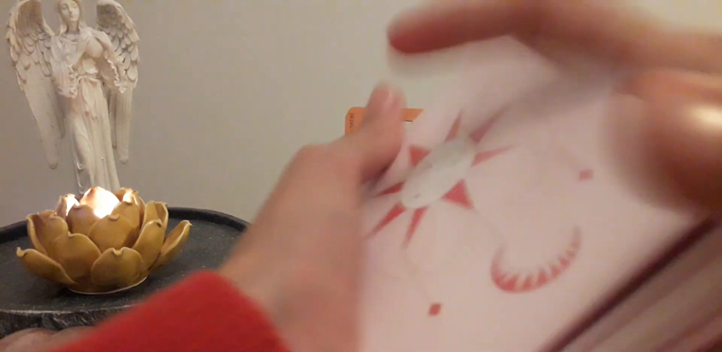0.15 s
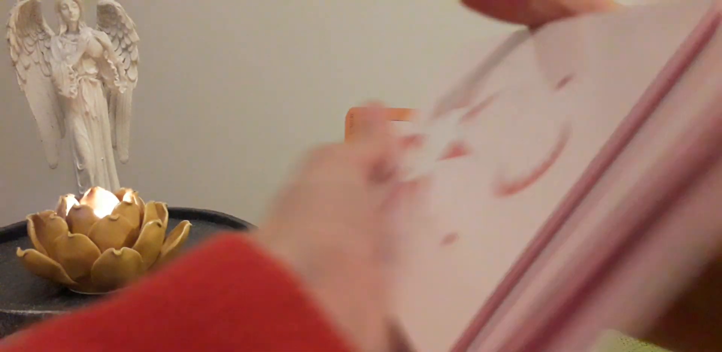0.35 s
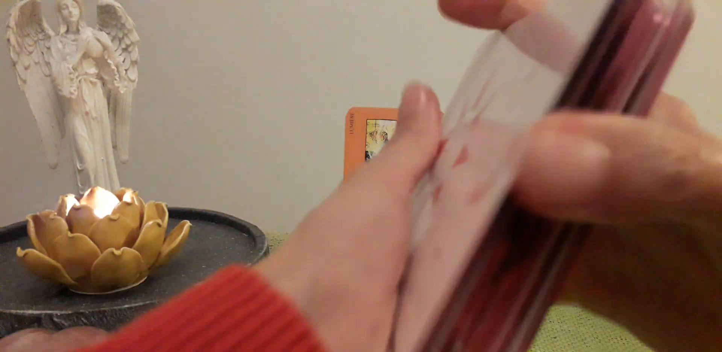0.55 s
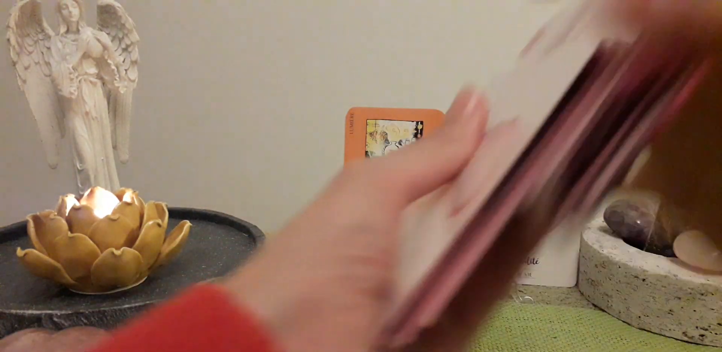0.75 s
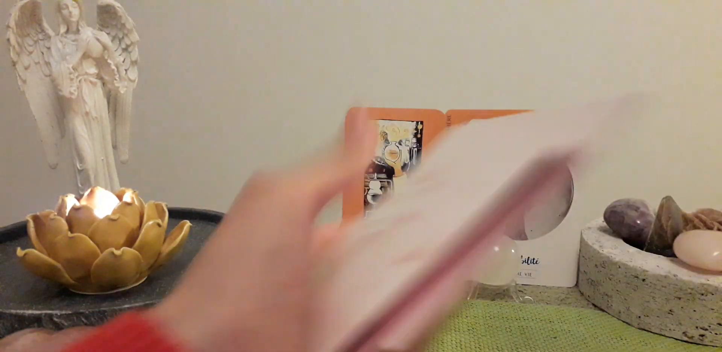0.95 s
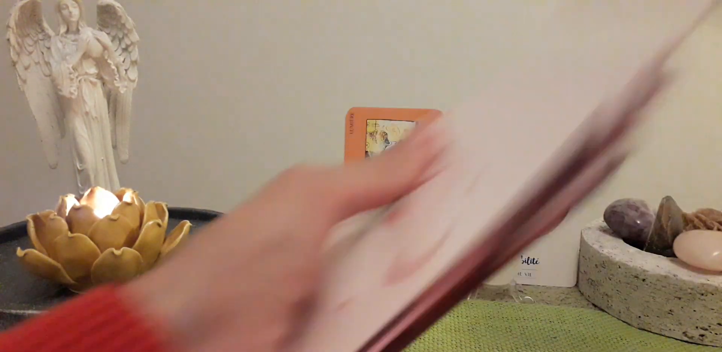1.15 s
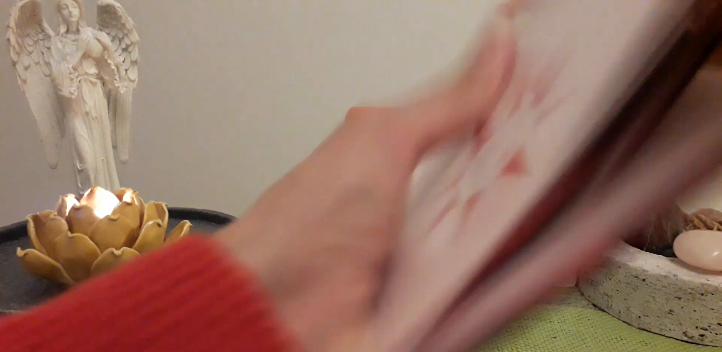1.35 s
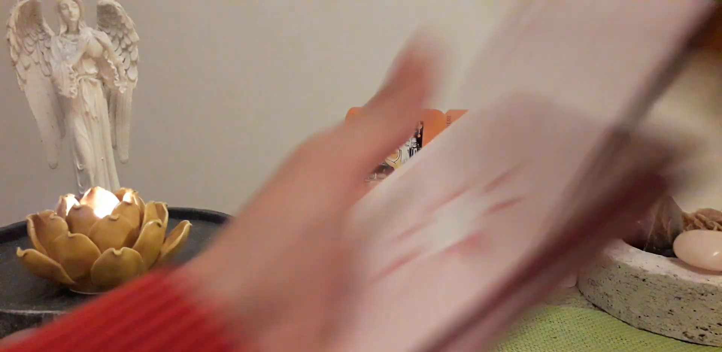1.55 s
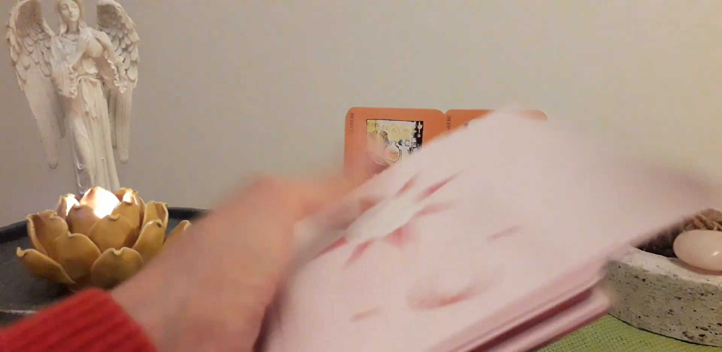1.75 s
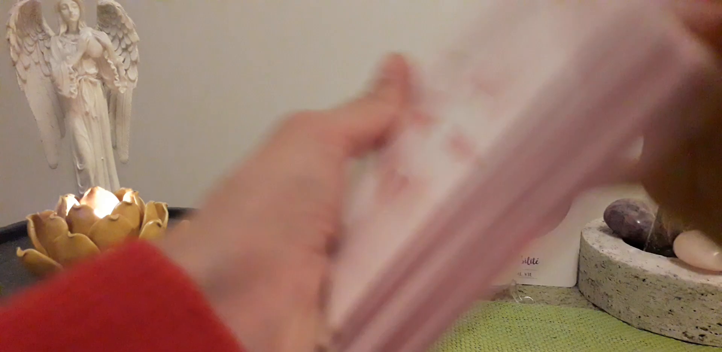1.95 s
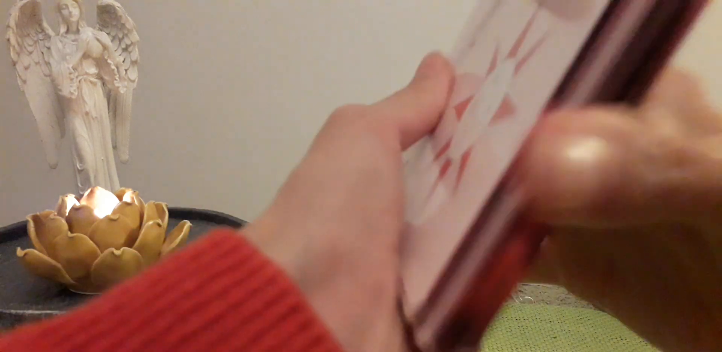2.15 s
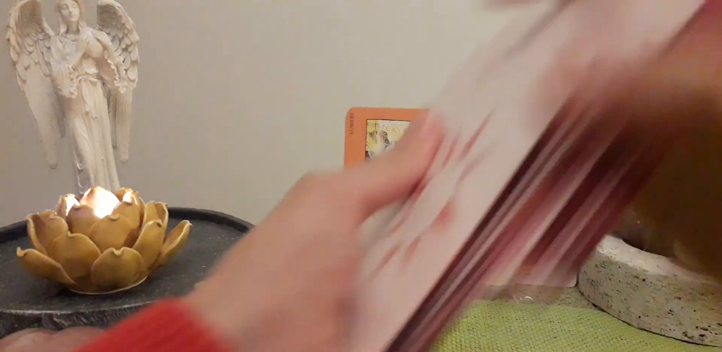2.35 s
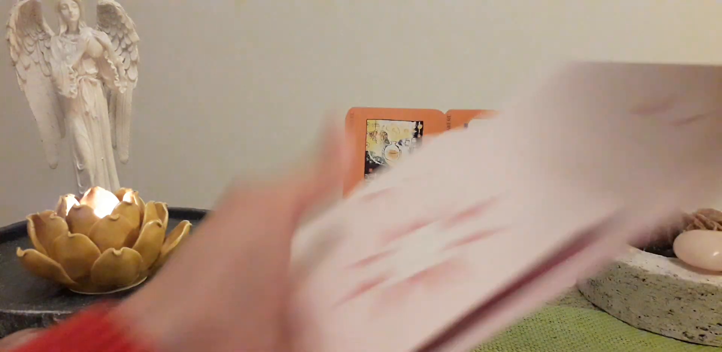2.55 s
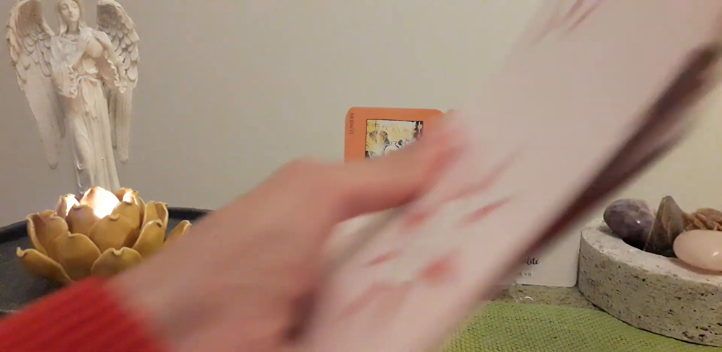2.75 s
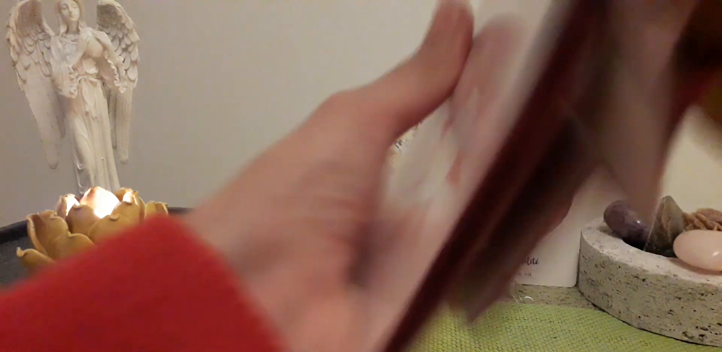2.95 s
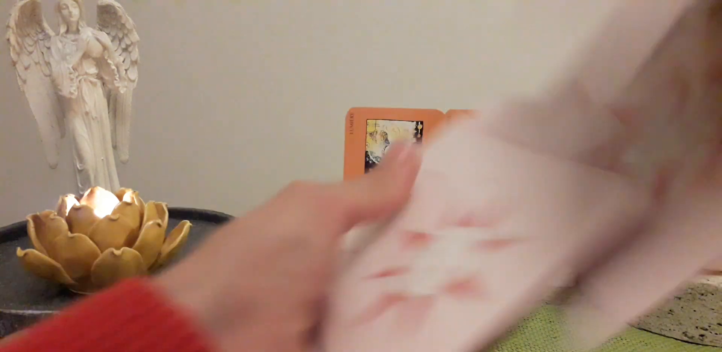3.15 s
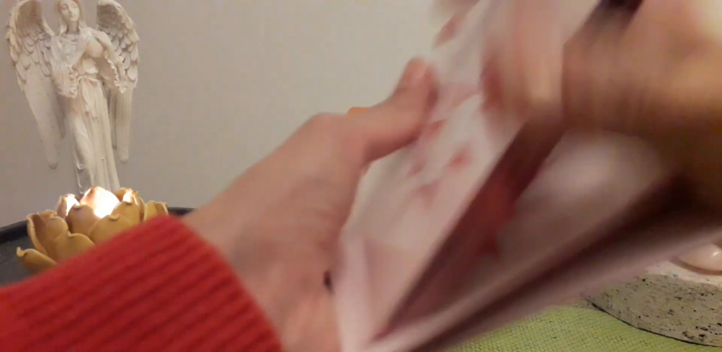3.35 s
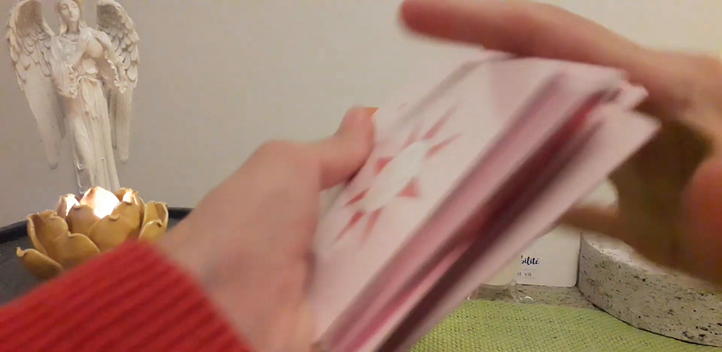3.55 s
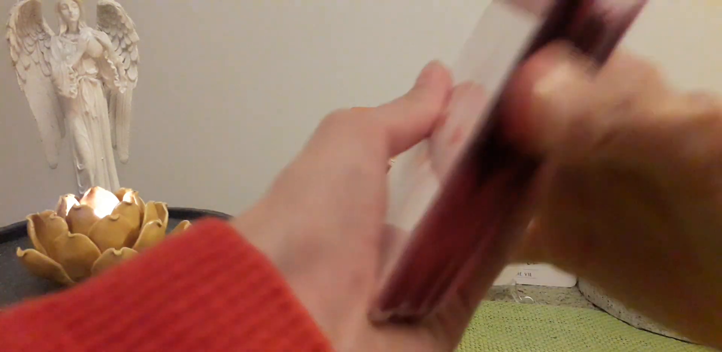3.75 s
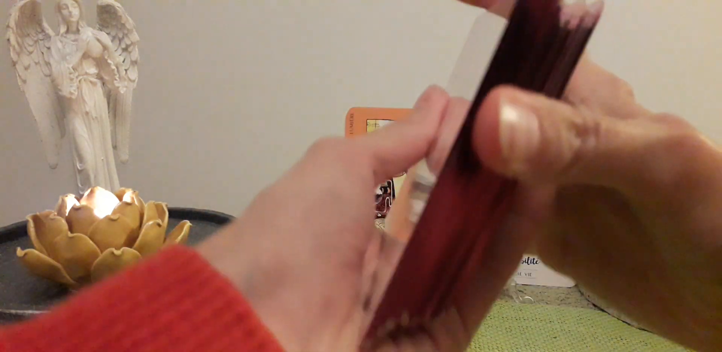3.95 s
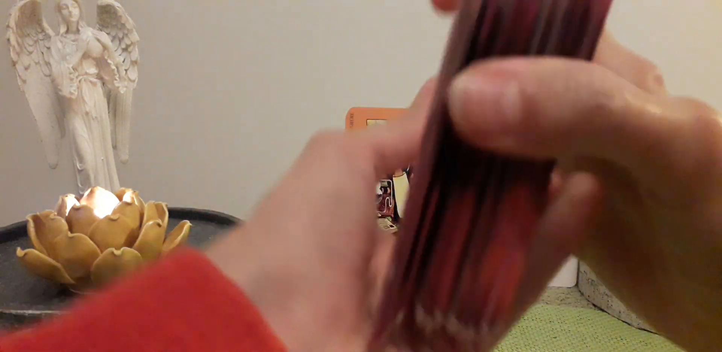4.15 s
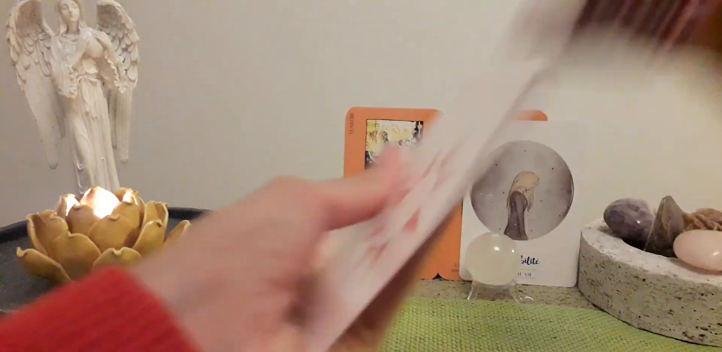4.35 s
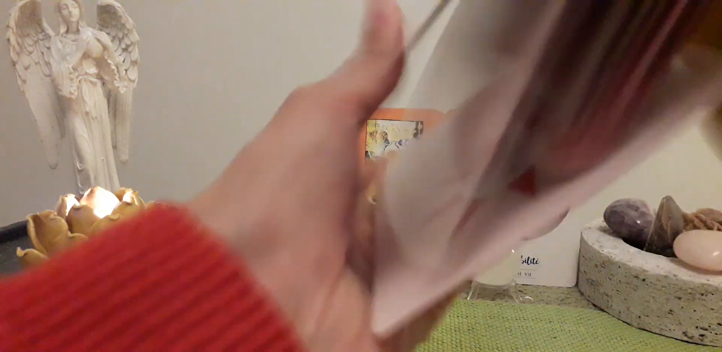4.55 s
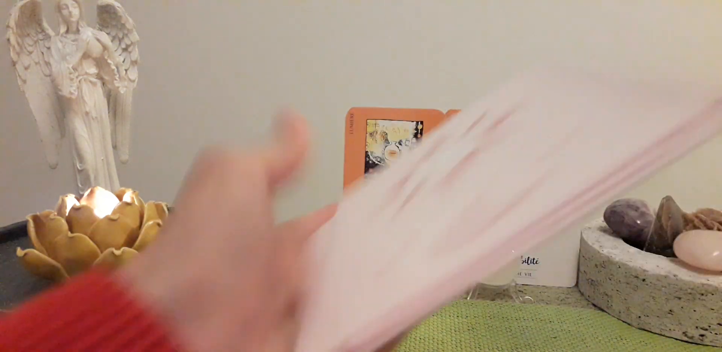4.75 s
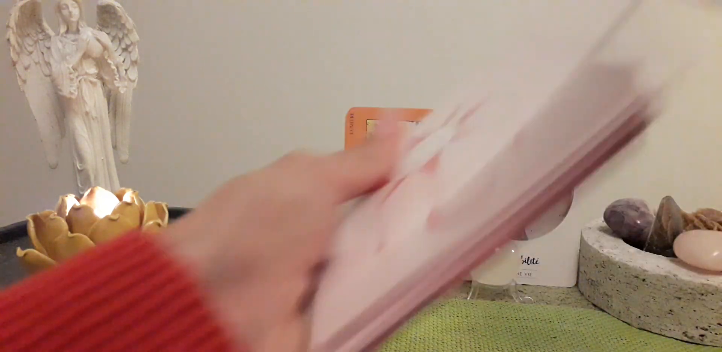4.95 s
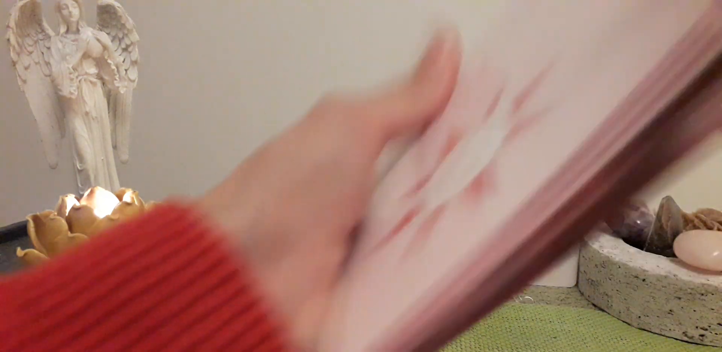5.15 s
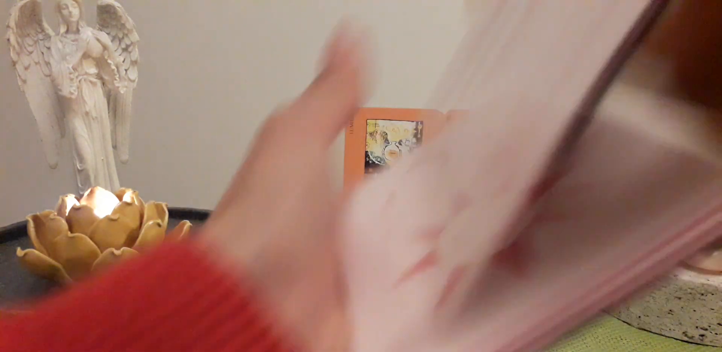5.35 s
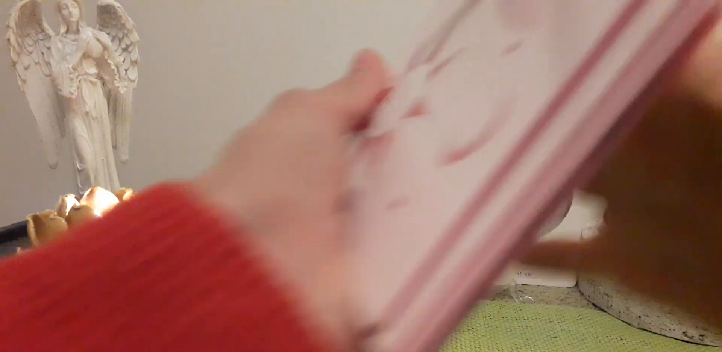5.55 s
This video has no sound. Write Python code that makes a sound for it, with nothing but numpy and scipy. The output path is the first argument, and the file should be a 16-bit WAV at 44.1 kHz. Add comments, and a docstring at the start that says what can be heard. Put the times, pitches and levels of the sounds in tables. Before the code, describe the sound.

Large stiff cards are shuffled overhand close by, with sharp edge slaps, gritty papery slides and soft palm thuds in a quiet room.

```python
"""A quiet furnished room: large cards are shuffled overhand close to a small microphone.
Packets slide off the deck with a gritty hiss of noise and tiny catches, and card edges slap on the pile
as cracks with short noise bursts. Whole packets land in the palm with a low thud, the knocked deck and
the table top ring out, and a thumb rubs a bowed card through one broad resonance.
The room answers with a short tail of dying noise; the microphone has a strong treble resonance."""
import sys
import numpy as np
from scipy import signal
from scipy.fft import rfft, irfft
from scipy.io import wavfile

SR = 44100
rng = np.random.default_rng(int(sys.argv[2]) if len(sys.argv) > 2 else 0)


def transcribe(u):
    """Save the signal u as a 16-bit wav file named by the first command-line argument.

    u: samples, shape (n,) or (channels, n), limited to [-1, 1]; the rate is SR.
    q: integer samples, one column per channel.
    """
    v = np.clip(np.atleast_2d(u).T, -1, 1)
    q = np.round(v * 32767).astype(np.int16)
    wavfile.write(sys.argv[1], SR, q)


N = 247740   # samples


def from_db(db):
    """Decibels to an amplitude factor."""
    return 10 ** (np.asarray(db) / 20)


def rms_one(x):
    """Scales a signal to rms 1."""
    return x / np.sqrt(np.mean(x ** 2) + 1e-20)


def at_hz(points, hz):
    """A table of (Hz, value) read on a log-frequency axis."""
    points = np.array(points)
    return np.interp(np.log(hz + 1), np.log(points[:, 0]), points[:, 1])


def colour(x, spectrum):
    """Shapes a steady signal to a spectrum; rms 1."""
    gain = from_db(at_hz(spectrum, np.fft.rfftfreq(N, 1 / SR)))
    return rms_one(irfft(rfft(x) * gain, N))


def band_pass(x, low_hz, high_hz):
    """Keeps the band between two corners."""
    return signal.sosfilt(signal.butter(2, [low_hz, high_hz], "band", fs=SR, output="sos"), x)


def high_pass(x, hz, order):
    """Takes away what lies below a corner."""
    return signal.sosfilt(signal.butter(order, hz, "high", fs=SR, output="sos"), x)


def resonance(x, hz, width_hz):
    """One damped resonance, gain 1 on top."""
    r, w = np.exp(-np.pi * width_hz / SR), 2 * np.pi * hz / SR
    return signal.lfilter([(1 - r * r) / 2, 0, (r * r - 1) / 2], [1, -2 * r * np.cos(w), r * r], x)


def ring(x, hz, t60):
    """A unit click sets a sine of starting height 1 ringing; it loses 60 dB in t60 seconds."""
    r, w = from_db(-60 / (t60 * SR)), 2 * np.pi * hz / SR
    return signal.lfilter([0, np.sin(w)], [1, -2 * r * np.cos(w), r * r], x + 1e-18)


def flicker(rate_hz):
    """Slow random wandering of spread 1: noise through two equal low-pass poles."""
    r = np.exp(-2 * np.pi * rate_hz / SR)
    wander = signal.lfilter([1], [1, -2 * r, r * r], rng.standard_normal(N + SR))
    return rms_one(wander[SR:])   # the first second lets the filter settle


def grit(per_s, spread_db, grain_db, clump_db):
    """Friction: white noise plus uneven tiny catches, swelling in clumps of a few ms."""
    sizes = from_db(spread_db * np.minimum(rng.exponential(1, N), 4)) * rng.choice([-1, 1], N)
    catches = rms_one(sizes * (rng.random(N) < per_s / SR))
    rub = rng.standard_normal(N) + from_db(grain_db) * catches
    return rub * from_db(clump_db * flicker(99))


# Still room air. Each row: frequency in Hz, relative level in dB per Hz.
AIR_SPECTRUM = [(24, -18.5), (40, 9), (104, 8.5), (852, -19), (990, -17), (1810, -18.5), (1950, -19),
                (10400, -12.5), (16000, -15.5)]
AIR_DB = -73.5   # rms


def still_air():
    """The steady murmur of the room: noise shaped to one spectrum."""
    return from_db(AIR_DB) * colour(rng.standard_normal(N), AIR_SPECTRUM)


# Bending of the cards. Each row: resonance in Hz, width in Hz, relative level in dB.
CARD_BENDING = [(487, 730, -11.5), (1396, 542, 1.5), (1677, 830, 1.5), (2576, 620, 0), (3720, 1295, 3.5),
                (4400, 5260, -2), (7430, 1200, -6)]


def bending(x, patchy_db):
    """Broad card resonances that come and go as the grip changes; rms 1."""
    total = 0
    for k, (hz, width_hz, db) in enumerate(CARD_BENDING):
        grip = from_db(db + patchy_db * flicker(40))
        total = total + (-1) ** k * grip * resonance(x, hz, width_hz)
    return rms_one(total)


# Treble of thin card edges, in slides and slaps. Each row: frequency in Hz, relative level in dB per Hz.
HISS_SPECTRUM = [(2500, -31.5), (5000, -1.5), (7000, -5.5), (9000, -5.5), (11000, 0.5), (13000, -1),
                 (16000, -1.5)]
# Card sliding on card. Each row: time of the top in seconds, fine hiss in dB,
# coarse rasp in dB above the hiss, rise in ms, fall in ms.
SLIDES = [(0.002, -69, 10, 5.7, 49), (0.109, -58, -3.5, 44, 58), (0.138, -34, 3.5, 3.6, 9),
          (0.156, -61.5, 12, 5.5, 97), (0.398, -53, -11.5, 63, 140), (0.429, -59.5, -0.5, 22, 54),
          (0.587, -53.5, -13.5, 43, 48), (0.653, -54.5, -17.5, 16, 92), (0.768, -54.5, -6, 58, 110),
          (0.845, -40.5, -10, 29, 16), (1.053, -38, -9.5, 7.9, 23), (1.074, -30, -2, 15, 20),
          (1.133, -26.5, -21.5, 42, 33), (1.335, -28, -6.5, 9, 77), (1.402, -23, -14, 44, 26),
          (1.594, -42.5, -4.5, 5.3, 51), (1.608, -40.5, 4.5, 5.1, 27), (1.661, -39.5, -11, 41, 8.9),
          (1.691, -27.5, -18, 21.5, 22), (1.89, -27, -8.5, 19, 41), (2.155, -58.5, -14.5, 100, 200),
          (2.315, -59, -13.5, 56, 130), (2.424, -51, -6, 95, 86), (2.48, -41, -4, 21, 51),
          (2.608, -46, -0.5, 2.5, 69), (2.661, -37, 5.5, 3.7, 62), (2.733, -28.5, -21, 49, 5.1),
          (2.76, -35, -17, 5.6, 18), (2.859, -44, 1, 110, 52), (2.874, -34, 1.5, 3.7, 88),
          (2.908, -28.5, 3.5, 17, 31), (2.931, -34, 7.5, 4.8, 34), (2.96, -43, 7.5, 23, 89),
          (3.197, -50.5, -4, 24, 350), (3.263, -42, -6, 1.5, 123), (3.384, -44, -4.5, 40, 64),
          (3.45, -51, -11, 6.2, 53), (3.49, -38.5, -2, 39, 17), (3.67, -49.5, -7.5, 78, 80),
          (3.876, -61.5, -23.5, 76, 53), (4.095, -54, -13, 20, 93), (4.215, -58, -15.5, 25, 97),
          (4.266, -56, 3, 29, 82), (4.346, -36, -22.5, 57, 13), (4.571, -40.5, 6, 7.8, 70),
          (4.631, -31.5, -5, 58, 13), (4.833, -39.5, -6.5, 2.5, 130), (4.921, -38.5, -6, 150, 39),
          (5.112, -31.5, -7, 3.7, 76), (5.157, -23, -10.5, 5, 29), (5.381, -35.5, -2, 5.7, 70)]
SLIDE_SWING_DB = 20   # what the hiss gains in its rise time and loses in its fall time
RISE_BEND, FALL_BEND = 1.5, 1.4   # 1 = straight in dB, more = flatter top and steeper ends
RASP_RISE_SHARE, RASP_FALL_SHARE = 0.93, 0.56   # the rasp swings less than the hiss and lingers


def slides():
    """Slides swell and die away; harder ones clump more unevenly, and the cards fan low puffs of air."""
    hiss, rasp = np.zeros(N), np.zeros(N)
    for s, db, rasp_db, rise, fall in SLIDES:
        at = slice(max(round((s - .003 * rise) * SR), 0), min(round((s + .005 * fall) * SR), N))
        ms = (np.arange(at.start, at.stop) / SR - s) * 1000
        before = SLIDE_SWING_DB * (np.maximum(-ms, 0) / rise) ** RISE_BEND
        after = SLIDE_SWING_DB * (np.maximum(ms, 0) / fall) ** FALL_BEND
        hiss_level = from_db(db - before - after)
        rasp_level = from_db(db + rasp_db - RASP_RISE_SHARE * before - RASP_FALL_SHARE * after)
        hiss[at] = np.maximum(hiss[at], hiss_level)   # where slides overlap, the louder one is heard
        rasp[at] = np.maximum(rasp[at], rasp_level)
    pressure = np.clip((hiss / from_db(-36.5)) ** 0.5, 0, 1)
    fine = colour(grit(per_s=3400, spread_db=-6, grain_db=-10.5, clump_db=3.1 * pressure), HISS_SPECTRUM)
    coarse = grit(per_s=2100, spread_db=9.5, grain_db=-2.0, clump_db=1.3 * pressure)
    coarse = bending(coarse, patchy_db=2.5)
    puffs = band_pass(rng.standard_normal(N), low_hz=70, high_hz=380)
    puffs = rms_one(puffs * from_db(0.83 * flicker(31)))
    return hiss * fine + rasp * (coarse + from_db(-14.0) * puffs)


# Decay of the room. Each row: frequency in Hz, time to lose 60 dB in seconds.
ROOM_T60 = [(100, 0.35), (700, 0.38), (2000, 0.34), (5000, 0.44), (13000, 0.34)]
# Colour of the tail. Each row: frequency in Hz, relative level in dB.
ROOM_LEVEL = [(100, 3.5), (400, 3), (1300, 6.5), (5000, -1)]


def room(x):
    """A diffuse tail: noise that dies band by band, starting after the nearest wall."""
    t, tail = np.arange(SR // 2) / SR, 0
    edges = 60 * 2 ** np.arange(0, 8.6, .5)   # half-octave bands
    for low, high in zip(edges, edges[1:]):
        centre = np.sqrt(low * high)
        band = band_pass(rng.standard_normal(len(t)), low, min(high, SR * .45))
        tail = tail + band * from_db(at_hz(ROOM_LEVEL, centre) - 60 * t / at_hz(ROOM_T60, centre))
    tail = tail * np.clip((t - .003) / 0.0052, 0, 1)
    return signal.fftconvolve(x, tail / np.sqrt(np.sum(tail ** 2)))[:N]


# Card edges striking the pile. Each row: start in seconds, peak in dB before the low cuts,
# middle in dB above the treble (thin edge ticks low, flat slaps high), length in ms.
SLAPS = [(0.131, -11.5, -11, 7.8), (0.1876, -24, -5, 10), (0.8243, -35, -8, 1.5), (0.832, -52, -4, 2),
         (0.845, -25.5, -7, 1.1), (0.851, -22.5, 25, 1.3), (1.0637, -16.5, -1, 4.1), (1.1003, -19, 2, 3.6),
         (1.143, -20, -6.5, 13), (1.1666, -21, 23, 2), (1.3308, -5.5, -1, 1.07), (1.347, -14.5, 16, 2),
         (1.5718, -35, -29, 2.4), (1.602, -4, -7.5, 1.6), (1.7091, -9, 11.5, 1.5), (1.863, -32, 7, 4.8),
         (1.868, -20, 4, 1.5), (1.88, -20, -14, 1.6), (1.893, -20, -29, 3.2), (1.917, -26, -1, 1.1),
         (1.942, -14, 0, 1.33), (2.414, -29.5, 3, 0.41), (2.6501, 1, -0.5, 1.38), (2.654, -20, -25, 2.4),
         (2.663, -12, -19, 2.9), (2.683, -10, -9, 0.71), (2.8782, -24, -6, 0.77), (2.888, -15.5, -21, 3.9),
         (2.8942, -12, -2, 1.9), (2.9017, -4.5, 8, 1.3), (2.906, -0.5, -8, 0.54), (2.9273, -1.5, -2.5, 0.9),
         (2.9349, -9.5, 12, 1.8), (3.0223, -21, -0.5, 3.9), (3.041, -21, -4, 4), (3.049, -18.5, 2, 0.44),
         (3.3055, -25.5, 1.5, 0.57), (3.3163, -19.5, 26.5, 2.1), (3.441, -23.5, 28, 24),
         (3.4993, -19.5, 7.5, 0.78), (3.611, -26.5, 2, 2.3), (4.347, -37, -2, 1.4), (4.36, -37.5, 7, 2.1),
         (4.542, -41, -8, 1), (4.5592, -39.5, 15, 1.7), (4.5679, 2, -11, 0.62), (4.605, -15, -12, 10),
         (4.642, -22.5, 11, 2.3), (4.7065, -15, -3, 1.1), (4.733, -9.5, -6.5, 1.5),
         (4.8465, -18.5, -8.5, 9.5), (4.87, -12.5, -3, 2.2), (4.8876, -18.5, -4, 0.5),
         (4.91, -17, -15, 1.3), (4.9539, -17.5, -4, 3.9), (5.024, -40.5, 0, 1.2), (5.1094, -27, -1, 1.4),
         (5.132, -16, -11, 8.6), (5.153, -17.5, 15, 3.7), (5.2657, -26.5, -13, 0.44),
         (5.3884, -5, -13, 1.88), (5.403, -11, 9, 0.87), (5.4092, -16, -17, 3.6), (5.452, -17, 35, 0.78)]
ATTACK_SHARE = 0.043   # of a slap's length
CRACK = 1.6   # first contact against the burst behind it, for slaps up to 1 ms; less for longer ones
EDGE_CUT_HZ, FLAT_CUT_HZ = 1800, 310   # slaps radiate little below here


def slaps():
    """A crack of first contact, then a burst of edge contacts; the flatter the card, the more middle.
    Second row: what spreads to the walls, its energy and colour evened out over all directions."""
    ms = np.arange(round(.03 * SR)) * 1000 / SR
    edge, flat = np.zeros((2, N)), np.zeros((2, N))
    treble = colour(rng.standard_normal(N), HISS_SPECTRUM)
    middle = bending(rng.standard_normal(N), patchy_db=1.5)
    click = np.eye(1, len(ms))[0]
    bent = 0   # the click as the bending card answers it
    for k, (hz, width_hz, db) in enumerate(CARD_BENDING):
        bent = bent + (-1) ** k * from_db(db) * resonance(click, hz, width_hz)
    for s, db, full_db, length in SLAPS:
        at = slice(round(s * SR), round(s * SR) + len(ms))
        attack = np.minimum(ms / (0.037 + ATTACK_SHARE * length), 1)
        shape = attack * np.exp(-ms / max(length, .2))
        crack = CRACK / max(length, 1)
        thin = shape * treble[at] + crack * click
        full = from_db(full_db) * (shape * middle[at] + crack * bent / np.abs(bent).max())
        thin_spread = click * np.linalg.norm(thin)
        full_spread = bent * np.linalg.norm(full) / np.linalg.norm(bent)
        gain = from_db(db) / np.abs(thin + full).max()
        edge[:, at] += gain * np.array([thin, thin_spread])
        flat[:, at] += gain * np.array([full, full_spread])
    return high_pass(edge, EDGE_CUT_HZ, order=3) + high_pass(flat, FLAT_CUT_HZ, order=2)


# Hollow of the hand. Each row: resonance in Hz, level in dB, time to lose 60 dB in seconds.
PALM = [(226, -18, 0.057), (472, -26, 0.021), (740, -30.5, 0.05)]
# Packets landing in the palm. Each row: time of the top in seconds, top of the swell in dB, pitch in Hz.
THUDS = [(0.144, -36.5, 160), (0.832, -48, 217), (0.855, -33, 340), (1.082, -38, 196), (1.17, -39, 247),
         (1.333, -31, 304), (1.351, -29, 155), (1.429, -33.5, 265), (1.606, -32, 147), (1.726, -29, 277),
         (1.891, -25, 230), (1.9403, -20, 392), (2.502, -36, 213), (2.67, -33, 131), (2.814, -38.5, 187),
         (2.91, -29, 243), (2.937, -14.5, 377.7), (3, -31, 166), (3.032, -24, 268), (3.045, -23.5, 342),
         (3.06, -36, 144), (3.499, -18, 583), (4.351, -48, 149), (4.362, -49, 228), (4.571, -33.5, 280),
         (4.614, -29.5, 290), (4.649, -31, 247), (4.737, -34, 210), (4.881, -28.5, 203), (4.977, -39, 200),
         (5.134, -35.5, 181), (5.16, -29, 300), (5.409, -30, 144), (5.455, -27.5, 223)]
THUD_CYCLES = 0.57   # length of the back of a swell, in cycles of its pitch, before chance
THUD_FRONT = 0.35   # length of the front against the back


def thuds():
    """A soft push of flesh and air, a low swing never twice alike; the hollow under it rings on."""
    push = np.zeros(N)
    chance = rng.uniform(-0.83, 1, (len(THUDS), 2))
    for (s, db, hz), (phase, longer) in zip(THUDS, chance):
        near = np.arange(max(round((s - 3 / hz) * SR), 0), round((s + 3 / hz) * SR))
        cycle = (near / SR - s) * hz
        length = np.where(cycle < 0, THUD_FRONT, 1) * THUD_CYCLES * (1 + 0.1 * longer)
        swell = np.exp(-(cycle / length) ** 2)
        push[near] += from_db(db) * swell * np.cos(2 * np.pi * cycle + np.pi * phase)
    hollow = sum(from_db(db) * 2 * np.pi * hz / SR * ring(push, hz, t60) for hz, db, t60 in PALM)
    return push + hollow


# The thumb drags over a bowed card, which colours the rub.
# Each row: time of the top in seconds, level in dB, centre in Hz, half length in ms.
RUBS = [(0.44, -69, 1610, 29), (0.775, -65, 1790, 20), (4.103, -62.5, 3800, 15), (4.28, -58, 1750, 37)]
RUB_WIDTH_HZ = 600   # of each of two equal resonances in a row


def rubs():
    """Gritty friction through one broad resonance, swelling and fading."""
    t, total = np.arange(N) / SR, 0
    catches = grit(per_s=990, spread_db=2.5, grain_db=-2.0, clump_db=0.5)
    for s, db, hz, ms in RUBS:
        swell = np.exp(-((t - s) * 1000 / ms) ** 4)
        tone = resonance(resonance(catches, hz, RUB_WIDTH_HZ), hz, RUB_WIDTH_HZ)
        total = total + from_db(db) * swell * rms_one(tone)
    return total


# Modes of the deck at the pitch DECK_HZ. Each row: frequency in Hz, level in dB,
# time in seconds in which each of two ringing stages loses 60 dB.
DECK = [(990, -10, 0.011), (1354, 0.5, 0.01), (1559, -13, 0.0069)]
DECK_HZ = 1350   # the pitch at which the modes stand as listed
# Knocks hard enough to ring the deck; the pitch shifts with the grip and the cards left in it.
# Each row: start in seconds, level in dB to which the mode levels are added, pitch in Hz.
KNOCKS = [(0.845, -37, 1750), (0.8495, -36, 1380), (1.0645, -26, 1560), (1.084, -29.5, 1460),
          (1.167, -35.5, 1230), (1.3305, -26, 1566), (1.347, -33, 1100), (1.4249, -34.5, 1250),
          (1.699, -31, 1580), (1.724, -30.5, 1240), (1.942, -29, 1440), (2.652, -23.5, 1470),
          (2.8948, -23, 1450), (2.901, -22, 1105), (2.9278, -9, 1335), (2.9381, -17, 1656),
          (3.316, -32, 1285), (3.4489, -28.5, 1620), (3.478, -33, 1680), (4.568, -22, 1346),
          (4.6044, -25, 1610), (4.8478, -31, 1620), (4.871, -25, 2390), (5.1093, -27, 2490),
          (5.1552, -21.5, 1460), (5.184, -25, 1350), (5.388, -26.5, 1410), (5.4015, -32, 1560)]


def knocks():
    """Every mode is struck with its own strength; the loose stack builds up over cycles and damps fast."""
    out, click = np.zeros(N + SR), np.eye(1, SR // 16)[0]
    strengths_db = rng.normal(0, 1.1, (len(KNOCKS), len(DECK)))
    for (s, db, pitch), mode_db in zip(KNOCKS, strengths_db):
        at = round(s * SR)
        tighter = pitch / DECK_HZ
        for (hz, level, t60), extra in zip(DECK, mode_db):
            mode_hz, mode_t60 = hz * tighter, t60 / tighter
            mode = ring(ring(click, mode_hz, mode_t60), mode_hz, mode_t60)
            out[at:at + len(click)] += from_db(db + level + extra) * mode / np.abs(mode).max()
    return out[:N]


# The table top rings on with many close modes.
# Each row: centre in Hz, width in Hz, level in dB, time to lose 60 dB in seconds.
TABLE_MODES = [(336, 220, -0.5, 0.3), (740, 290, -6.5, 0.3), (1308, 240, -0.5, 0.42)]
# Bumps of the deck on the table top.
# Each row: start in seconds, low modes in dB, high modes in dB.
BUMPS = [(0.852, -51, -54.5), (1.167, -54.5, -58.5), (1.727, -45.5, -68), (1.942, -48, -55.5),
         (2.93, -28, -33), (3.5, -42, -66), (5.157, -48.5, -48), (5.185, -53, -49)]


def table():
    """Each cluster of modes is a narrow noise band that builds up within 5 ms of a bump and dies away."""
    t, out = np.arange(SR // 2) / SR, np.zeros(N + SR)
    for s, low_db, high_db in BUMPS:
        at = round(s * SR)
        for hz, width_hz, db, t60 in TABLE_MODES:
            noise = rng.standard_normal(len(t))
            band = rms_one(resonance(resonance(noise, hz, width_hz), hz, width_hz))
            level_db = db + (low_db if hz < 1000 else high_db)
            out[at:at + len(t)] += from_db(level_db - 60 * t / t60) * np.minimum(t / .005, 1) * band
    return out[:N]


ROOM_DB = -12   # tail against the direct sound
KNOCK_ROOM_DB = -4.5   # knocks are shielded by the hands and reach the walls weaker


def scene():
    """Mixes the cards, the hand, the table top, the room's answer and the still air."""
    air, sliding = still_air(), slides()
    slapped, spread = slaps()
    landed, rubbed, knocked = thuds(), rubs(), knocks()
    to_walls = sliding + spread + landed + from_db(KNOCK_ROOM_DB) * knocked
    walls = from_db(ROOM_DB) * room(to_walls)
    return (air + sliding + slapped + landed + rubbed + knocked + table() + walls)[None]


MIC_HZ, MIC_WIDTH_HZ, MIC_DB = 10400, 1100, 8   # treble resonance
BASS_CUT_HZ = 55
TREBLE_STEP_HZ, TREBLE_STEP_DB = 15900, 35   # first treble cut: stop-band edge and depth
CUTOFF_HZ = 17040   # stop-band edge of the second treble cut


def record(dry):
    """The microphone's sound port lifts a treble band; bass falls away, peaks clip, two steps cut the top."""
    lifted = dry + (from_db(MIC_DB) - 1) * resonance(dry, MIC_HZ, MIC_WIDTH_HZ)
    heard = high_pass(lifted, BASS_CUT_HZ, order=2)
    clipped = 0.79 * np.clip(heard / 0.97, -1, 1)
    first_step = signal.cheby2(12, TREBLE_STEP_DB, TREBLE_STEP_HZ, fs=SR, output="sos")
    second_step = signal.cheby2(14, 40, CUTOFF_HZ, fs=SR, output="sos")
    return signal.sosfilt(second_step, signal.sosfilt(first_step, clipped))


dry = scene()
out = record(dry)
transcribe(out)
```